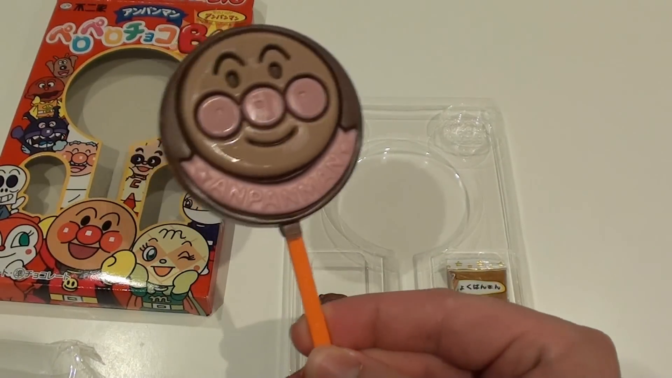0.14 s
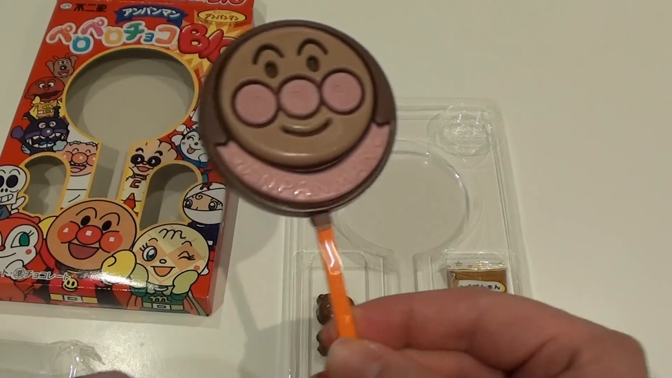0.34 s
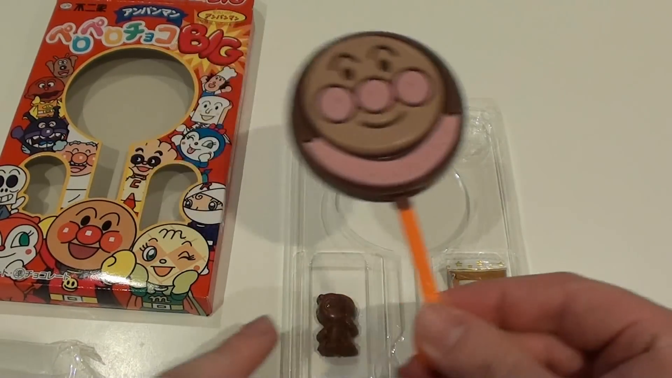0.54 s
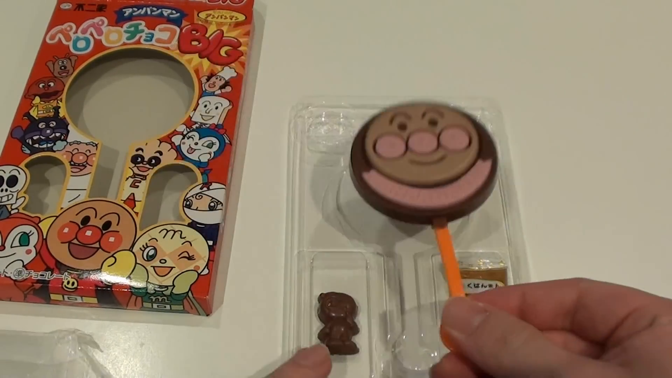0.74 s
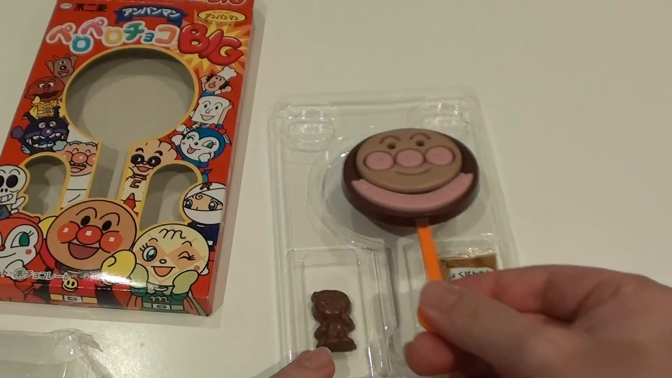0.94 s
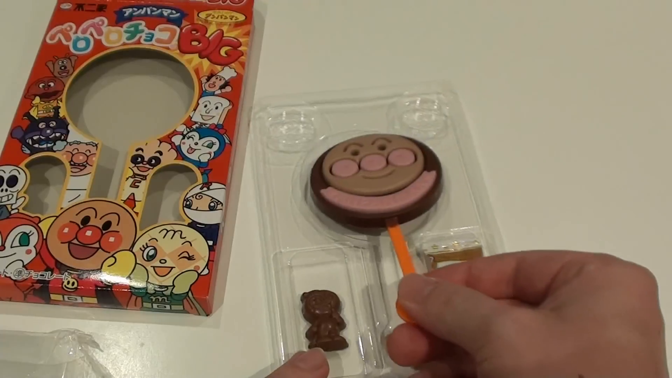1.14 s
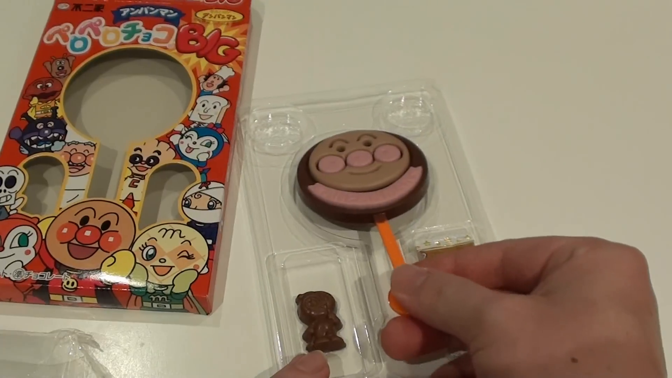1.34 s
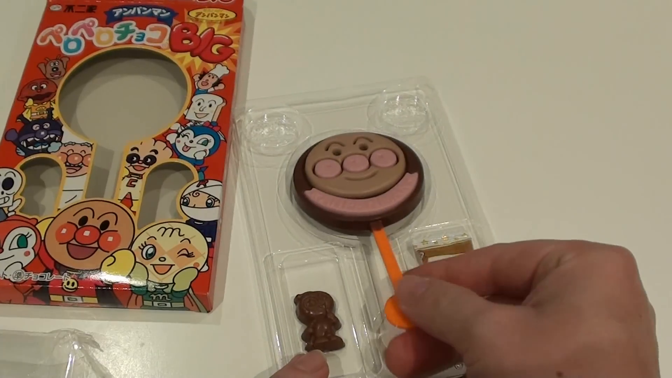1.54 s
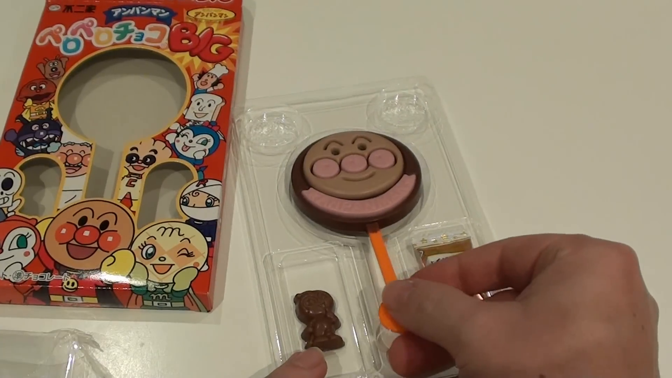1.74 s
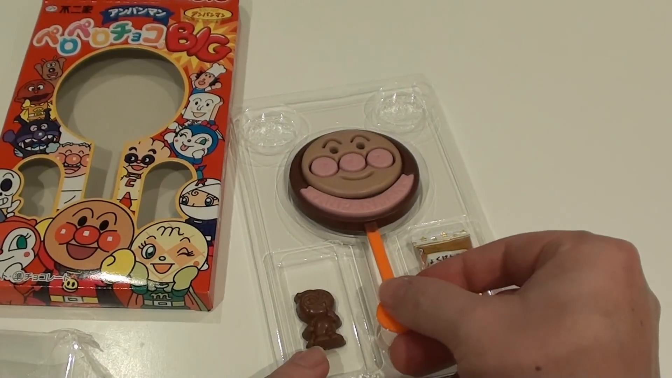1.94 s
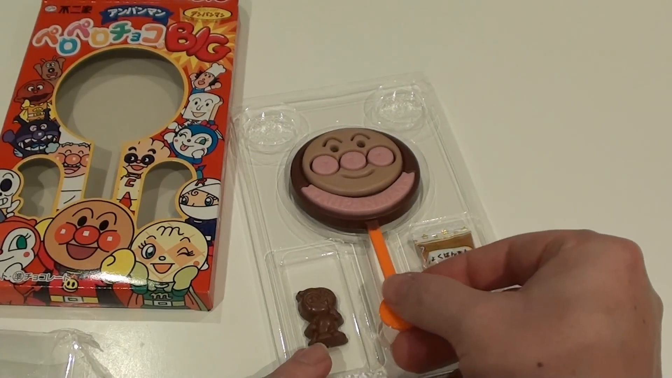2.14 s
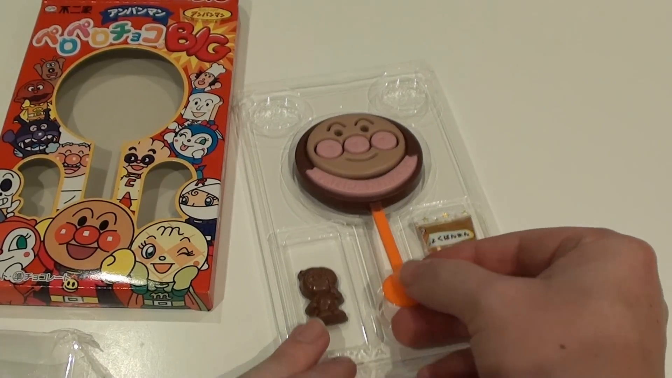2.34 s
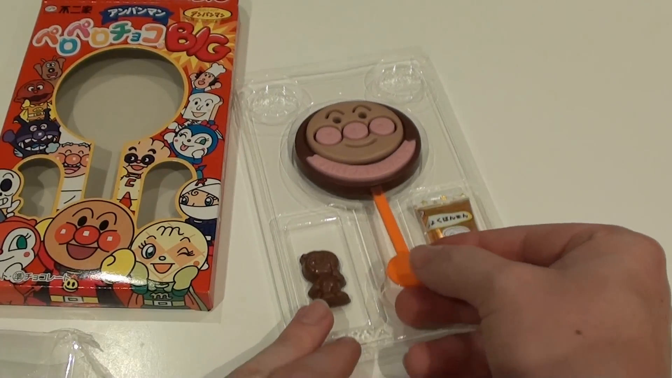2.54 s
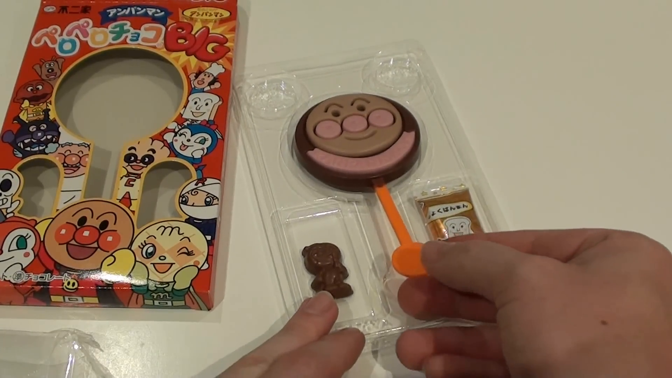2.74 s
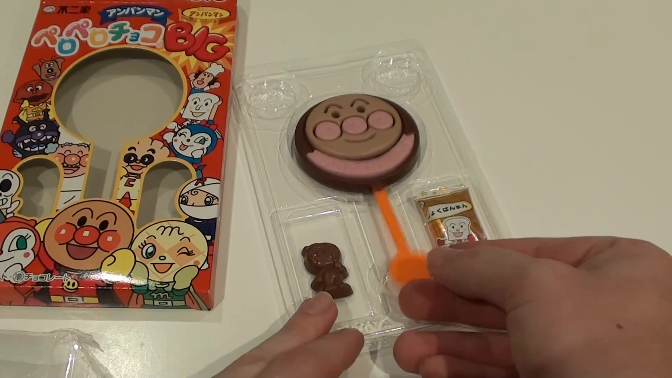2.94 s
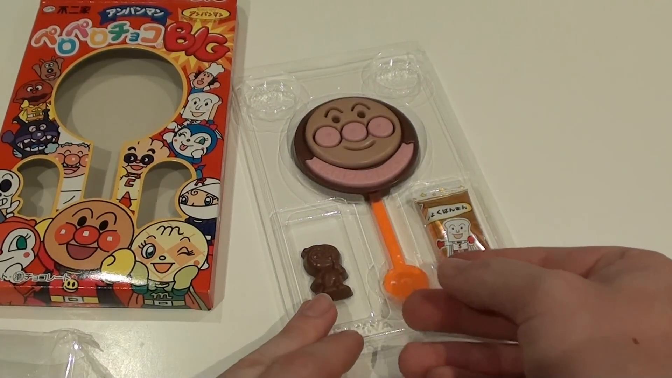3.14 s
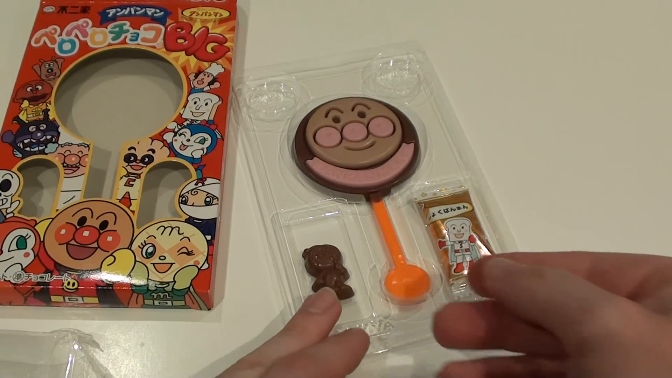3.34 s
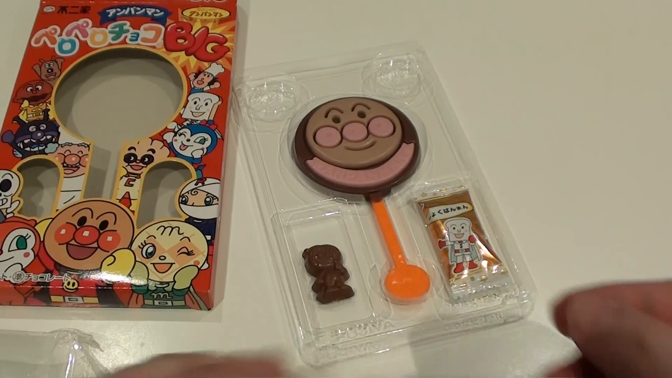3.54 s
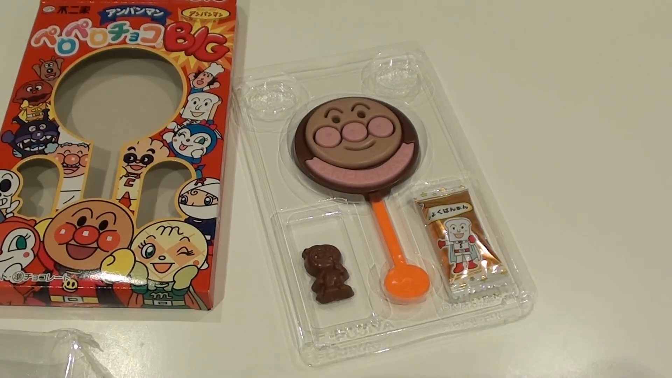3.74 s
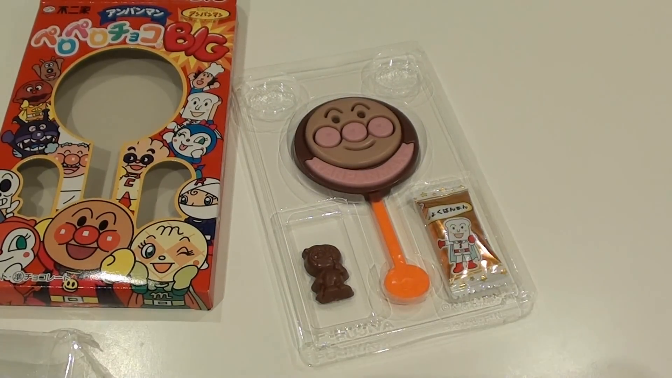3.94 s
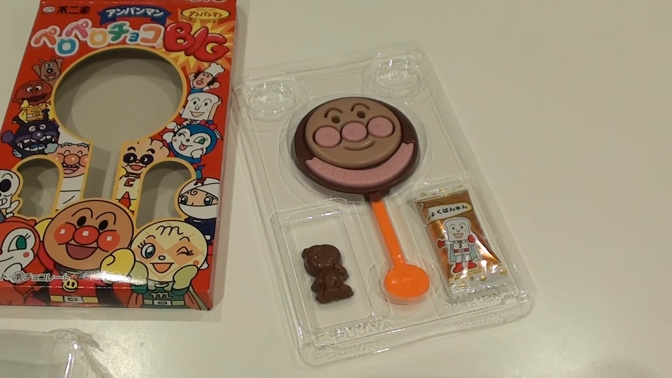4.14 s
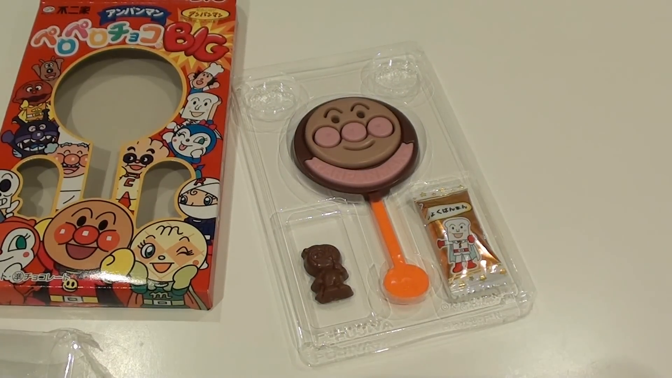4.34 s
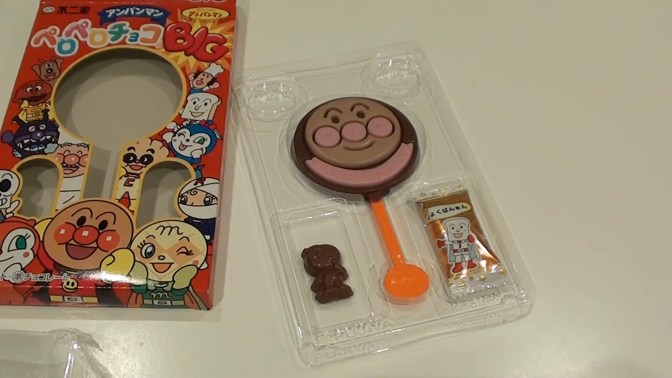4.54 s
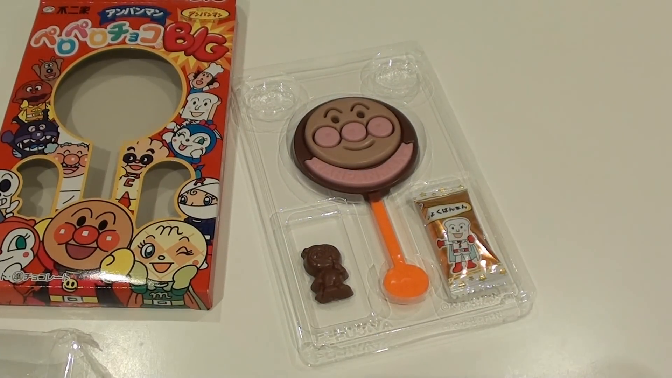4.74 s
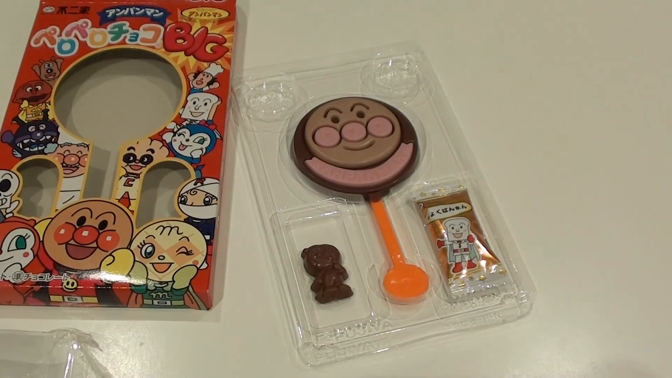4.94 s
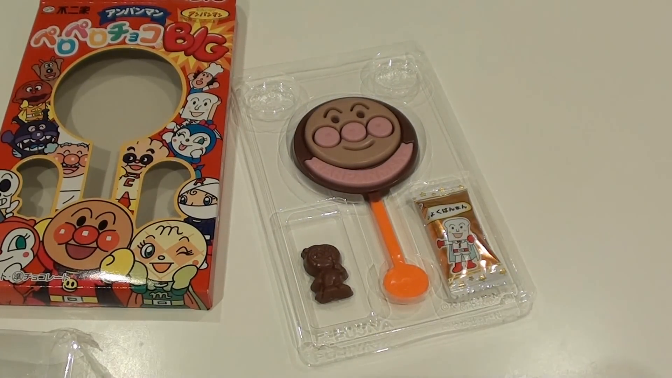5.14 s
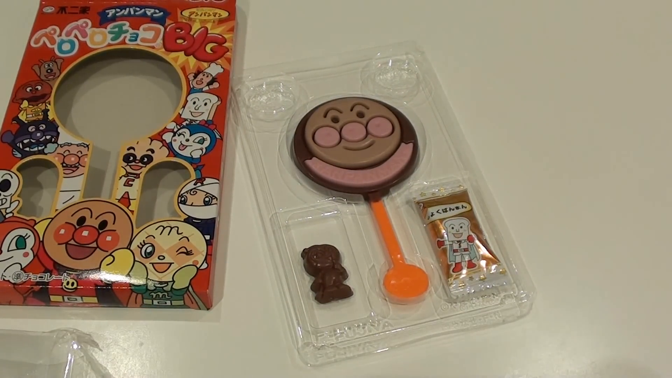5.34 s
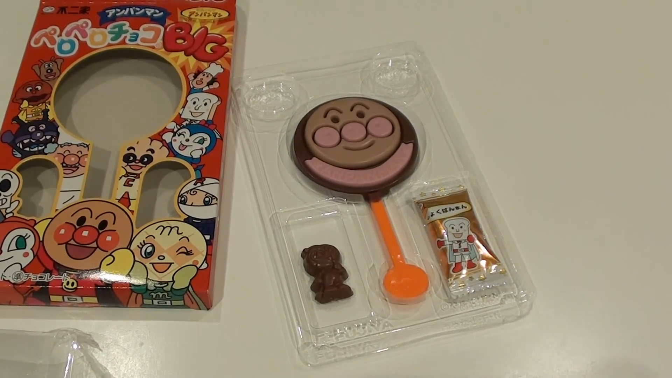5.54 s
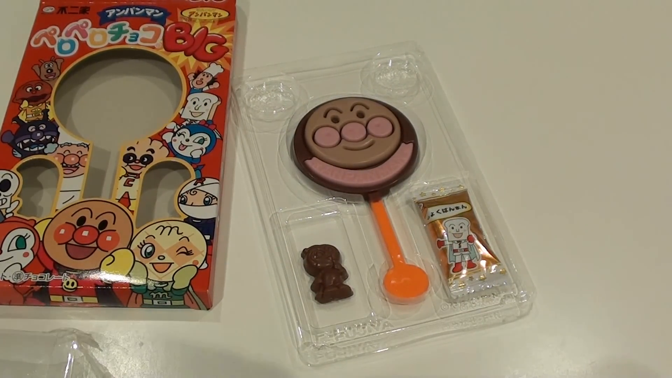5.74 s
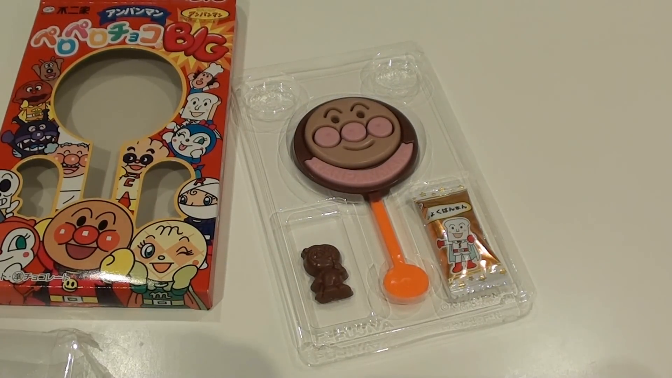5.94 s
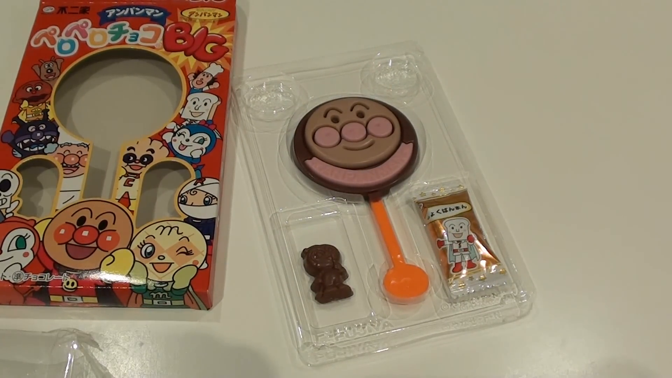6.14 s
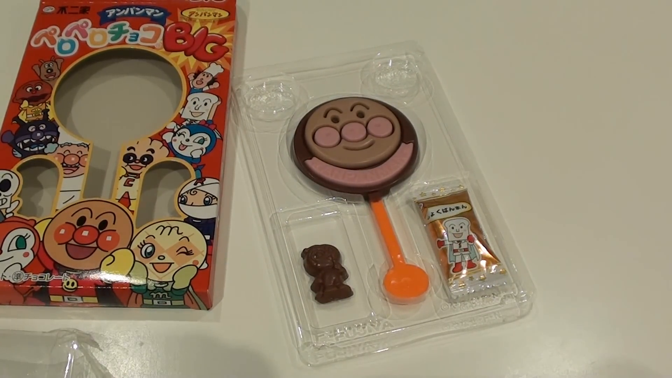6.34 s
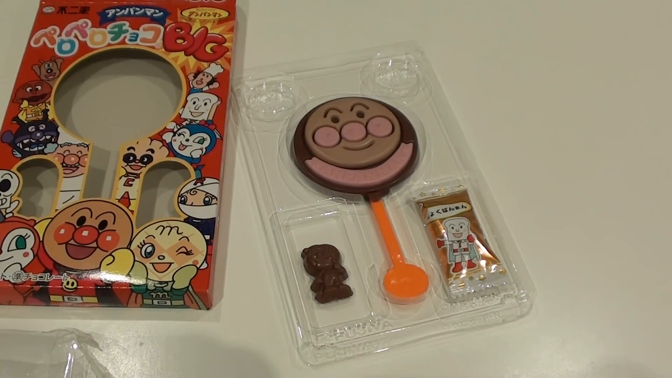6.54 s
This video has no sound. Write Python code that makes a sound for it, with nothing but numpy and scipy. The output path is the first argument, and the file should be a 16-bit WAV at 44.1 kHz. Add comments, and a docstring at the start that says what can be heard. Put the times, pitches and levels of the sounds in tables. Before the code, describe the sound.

Thin plastic packaging crackles, scrapes across a table and gives one hollow pop, followed by a faint sleeve brush and two small button clicks.

```python
"""A thin plastic blister tray crinkles over quiet room noise as a chocolate lolly is pressed into it.
Its creases tick, its side walls ring, and the sweet scrapes by stick-slip. The tray is slid over the
table, then its floor buckles back with one hollow pop as the fingers let go. A sleeve brushes the
table and the button of a nearby camera clicks twice. The small room adds a short tail."""
import sys
import numpy as np
from scipy import signal
from scipy.fft import rfft, irfft
from scipy.io import wavfile

SR = 44100
rng = np.random.default_rng(int(sys.argv[2]) if len(sys.argv) > 2 else 0)


def file_out(sig):
    """Save sig as 16-bit WAV at sys.argv[1]."""
    # one column per channel
    cols = np.atleast_2d(sig).T
    # limit, then scale
    lim = np.clip(cols, -1, 1)
    pcm = np.round(lim * 32767).astype(np.int16)
    wavfile.write(sys.argv[1], SR, pcm)


N = 291060
T = np.arange(N) / SR

# room rumble and microphone hiss: freq_hz, level_db
NOISE_SPECTRUM = [(20, -15), (50, -8.5), (100, 0), (125, -3), (170, 1), (280, 0.5), (400, -4.5), (900, -7),
                  (2000, -12.5), (4000, -12), (7500, -15), (10000, -13.5), (16000, -16)]
# camera hiss: freq_hz, level_db
CAMERA_HISS_SPECTRUM = [(4000, -24), (4550, 4), (4950, -10), (5430, 3), (6100, -12.5), (7000, -6.5),
                        (7600, -3), (8500, -34.5)]
# mains hum and camera whine: pitch_hz, level_db
STEADY_TONES = [(100, -74.5), (1066, -81), (6900, -80), (7500, -85), (8650, -82.5)]
# stereo width of the room noise: freq_hz, side_gain_db
NOISE_WIDTH = [(110, -15.5), (200, -11.5), (380, -2), (700, 1), (1300, 2), (2400, -1), (4400, -4),
               (8100, -7.5), (15000, -36.5)]
# stereo width of the reflections: freq_hz, side_gain_db
REFLECTION_WIDTH = [(200, -11.5), (700, -6.5), (1400, -7), (4400, -3.5), (8000, -2.5), (14000, -68)]
# sleeve on the table: time_s, drag_db, hiss_db
SLEEVE_LEVELS = [(3.6, -62.5, -68), (4.0, -62, -66), (4.16, -56, -59.5), (4.3, -58, -60.5),
                 (4.44, -59, -59), (4.58, -59.5, -52), (4.68, -63.5, -65), (5.0, -64, -75),
                 (5.3, -68.5, -75)]
# cloth drag: freq_hz, level_db
DRAG_SPECTRUM = [(200, -4), (700, -0.5), (2200, 0.5), (4500, -2.5), (7500, -4), (10000, -12), (16000, -34)]
# fine cloth hiss: freq_hz, level_db
CLOTH_HISS_SPECTRUM = [(2500, -17.5), (5000, -8.5), (7500, -1.5), (10000, -7.5), (16000, -16)]
# dull contacts on tray and table: start_s, level_db, pitch_hz
SOFT_TOUCHES = [(1.246, -47, 328), (4.048, -48, 700), (4.74, -54, 283)]
# camera button presses: start_s, level_db, treble_db
BUTTON_PRESSES = [(6.1234, -40, -7.5), (6.469, -29, -0.5)]
# button resonances: pitch_hz, level_db, t60_s
CLICK_MODES = [(1103, -5, 0.061), (2260, -12, 0.028), (2710, -5.5, 0.042), (3300, 8.5, 0.0046),
               (3770, -0.5, 0.019), (3780, -20, 0.12), (4330, 3, 0.012), (5840, -1, 0.011),
               (6370, -4.5, 0.011), (8000, -0.5, 0.0058)]
# fingertips on the tray floor: start_s, level_db
FINGER_PUSHES = [(1.03, -44), (1.155, -38), (1.258, -37.5), (1.345, -42), (1.625, -43), (3.402, -40)]
# flexing tray base: freq_hz, level_db
PANEL_SPECTRUM = [(130, -45.5), (186, -10.5), (240, -15.5), (600, -8.5), (950, -6), (1150, 0.5),
                  (1800, 0.5), (2400, -4), (3400, -16), (6000, -51)]
# small side walls: freq_hz, level_db
WALL_SPECTRUM = [(300, -26.5), (700, -13), (1100, -2), (1700, 2.5), (2150, -1), (2700, -18), (5000, -30.5),
                 (15000, -51)]
# stiff creases: freq_hz, level_db
CREASE_SPECTRUM = [(1200, -23), (2500, 1.5), (3400, -5), (4200, 0), (5100, -5), (6300, 0.5), (8300, -1.5),
                   (9300, -7.5), (12000, -13.5), (16000, -28)]
# one long light hold, then single hand strokes: start_s, length_s, panel_db, crease_db
RUB_STROKES = [(0.68, 1.45, -65, -66), (0.863, 0.047, -51, -56.5), (0.985, 0.14, -49.5, -53),
               (1.138, 0.24, -48, -57), (1.395, .11, -49.5, -69), (1.804, 0.025, -58.5, -65),
               (2.005, 0.27, -56, -71), (2.871, 0.23, -66, -63.5), (3.285, 0.086, -53.5, -55.5)]
# clearest crinkles: start_s, spread_s, wall_db, crease_db
CLEAR_CRINKLES = [(0.802, .002, -62, -55), (0.823, 0.0097, -60, -52), (0.834, 0.017, -58, -46),
                  (0.862, .005, -47, -67), (0.991, 0.007, -44.5, -47.5), (1.025, 0.0078, -48, -41),
                  (1.133, .0015, -41, -48), (1.150, 0.0034, -37.5, -46), (1.197, 0.0015, -42, -48),
                  (1.216, 0.0016, -40, -52), (1.238, 0.0019, -38, -47), (1.270, 0.011, -38, -40),
                  (1.314, 0.009, -39, -43), (1.353, .0012, -41, -47), (1.410, 0.0027, -44, -51),
                  (1.424, 0.0081, -38.5, -44.5), (1.433, 0.0028, -39.5, -45.5),
                  (1.470, 0.0054, -42.5, -43.5), (1.483, .006, -42.5, -44.5), (1.498, 0.021, -37.5, -44.5),
                  (1.539, 0.0032, -39, -40), (1.618, .0015, -52, -66), (1.672, 0.0014, -46.5, -56),
                  (1.803, .004, -38.5, -41.5), (1.874, 0.0065, -46.5, -64), (2.036, 0.0032, -45.5, -55),
                  (2.046, 0.014, -40.5, -57), (2.096, 0.0012, -49, -68), (2.106, 0.0023, -51, -74),
                  (2.187, 0.005, -49, -58), (3.067, 0.0049, -43.5, -54), (3.086, 0.014, -34, -41.5),
                  (3.401, 0.0013, -47.5, -43.5)]
# creases flipping over: start_s, level_db
CREASE_FLIPS = [(0.9928, -31.5), (1.0605, -11.5), (1.072, -38), (1.0905, -23.5), (1.2694, -43),
                (3.0987, -18.5), (3.131, -34), (3.1392, -24)]
# resonances of a flipping crease: pitch_hz, level_db, t60_s
CREASE_MODES = [(2040, -6.5, 0.0033), (2555, -5, 0.01), (3400, -13.5, 0.0096), (4320, -8, 0.0039),
                (5580, -3, 0.0046), (6410, -3.5, 0.008), (7200, -5.5, 0.0056), (8780, -10.5, 0.0037),
                (10400, -17, .003), (12400, -19, .003), (14000, -21, .003)]
# tray floor buckling: start_s, level_db
BUCKLES = [(3.0987, -29), (3.1023, -9), (3.133, -31)]
# tray floor resonances: pitch_hz, level_db, t60_s
TRAY_MODES = [(185.3, -7.5, 0.26), (209, -10.5, 0.18), (270, -13.5, 0.069), (334, -22.5, 0.25),
              (396, -23.5, 0.39), (421, -17.5, 0.15), (498, -13.5, 0.17), (576, -40, 0.45), (680, -17, .28),
              (761, -11, .13), (816, -14, .18), (840, -12.5, 0.094), (925, -0.5, .045), (917.5, -12, 0.075),
              (935, -2, 0.12), (1028, -10, 0.16), (1048, -17.5, 0.34), (1143, -17, 0.21), (1227, -26, 0.41),
              (1234, -2, 0.023), (1495, -19.5, 0.3), (1536, -16.5, 0.29), (1750, -24, 0.21),
              (1910, -26, 0.36), (2160, -11, 0.023), (2885, -13.5, 0.0076), (4100, -9.5, 0.0079)]
# dense weaker modes of the whole tray: freq_hz, level_db
SHUDDER_SPECTRUM = [(140, -58.5), (200, -27.5), (280, -8), (600, -9.5), (950, -1), (1300, -4.5), (1700, -6),
                    (2100, -9), (2650, -25.5), (4300, -23), (7000, -33.5), (15000, -51)]


def undb(db):
    """Decibels to gain."""
    return 10 ** (np.asarray(db) / 20)


def unit(x):
    """Scale to unit rms."""
    return x / np.sqrt(np.mean(x ** 2))


def convolve(x, response):
    """Convolution cut to scene length."""
    return signal.oaconvolve(x, response)[:N]


def bin_gains(spectrum, size):
    """FFT bin gains from (freq_hz, level_db) rows, interpolated in log frequency."""
    freq_hz, level_db = np.transpose(spectrum)
    bins_hz = np.maximum(np.arange(size // 2 + 1) * SR / size, 1)
    return undb(np.interp(np.log(bins_hz), np.log(freq_hz), level_db))


def colour(spectrum, size=4096):
    """Minimum-phase response of unit energy."""
    cepstrum = irfft(np.log(bin_gains(spectrum, size)))
    cepstrum[1:size // 2] *= 2
    cepstrum[size // 2 + 1:] = 0
    response = irfft(np.exp(rfft(cepstrum)))
    return response / np.linalg.norm(response)


def stereo_side(x, width):
    """Filtered side signal, opposite in left and right."""
    return np.outer([1, -1], irfft(rfft(x) * bin_gains(width, N), N))


def fade(t60_s, size=32768):
    """Exponential decay."""
    return np.exp(-np.log(1000) * T[:size] / t60_s)


def tail(t60_s):
    """Dense modes dying together: decaying noise of unit energy."""
    envelope = fade(t60_s)
    noise = envelope * rng.standard_normal(len(envelope))
    return noise / np.linalg.norm(noise)


def ring(modes, size=32768):
    """Damped modes of alternating sign."""
    return sum((-1) ** k * undb(level_db) * fade(t60_s) * np.sin(2 * np.pi * pitch_hz * T[:size])
               for k, (pitch_hz, level_db, t60_s) in enumerate(modes))


def add(track, start_s, sound):
    """Mix a sound in place."""
    start = int(start_s * SR)
    track[start:start + len(sound)] += sound[:N - start]


def impulses(rows):
    """One impulse per (start_s, level_db) row."""
    track = np.zeros(N)
    for start_s, level_db in rows:
        add(track, start_s, undb([level_db]))
    return track


def burst(drive, response, level_db):
    """Short filtered sound with the energy of 10 ms at level_db."""
    sound = signal.fftconvolve(drive, response)
    return sound * undb(level_db) * np.sqrt(SR / 100) / np.linalg.norm(sound)


def background(noise_db=-57.5, hiss_db=-67):
    """Diffuse room noise, mains hum, camera hiss and whine."""
    mid, side = (undb(noise_db) * convolve(noise, colour(NOISE_SPECTRUM))
                 for noise in rng.standard_normal((2, N)))
    hiss = undb(hiss_db) * convolve(rng.standard_normal(N), colour(CAMERA_HISS_SPECTRUM))
    tones = sum(np.sqrt(2) * undb(level_db) * np.sin(2 * np.pi * (pitch_hz * T + rng.random()))
                for pitch_hz, level_db in STEADY_TONES)
    return mid + hiss + tones + stereo_side(side, NOISE_WIDTH)


def room(x, wet_db, early_db, late_t60_s=0.36, early_t60_s=0.04, late_side_db=-3):
    """Walls add a diffuse tail after 5 ms; early reflections widen the sound."""
    late, late_side = (undb(wet_db) * convolve(x, np.pad(tail(late_t60_s), (SR // 200, 0)))
                       for _ in range(2))
    side = undb(early_db) * convolve(x, tail(early_t60_s)) + undb(late_side_db) * late_side
    return x + late + stereo_side(side, REFLECTION_WIDTH)


def sleeve(grain_db=3):
    """Cloth fibres drag over the table, briefly brighter before fading."""
    time_s, drag_db, hiss_db = np.transpose(SLEEVE_LEVELS)
    fibres = unit(rng.standard_normal((2, N)) * undb(grain_db * rng.standard_normal((2, N))))
    drag = convolve(fibres[0], colour(DRAG_SPECTRUM)) * undb(np.interp(T, time_s, drag_db))
    hiss = convolve(fibres[1], colour(CLOTH_HISS_SPECTRUM)) * undb(np.interp(T, time_s, hiss_db))
    return (drag + hiss) * (T > time_s[0])


def touches(t60_cycles=9, skirt_db=-16):
    """Soft contacts thud around one pitch each."""
    out = np.zeros(N)
    for start_s, level_db, pitch_hz in SOFT_TOUCHES:
        thud = colour([(pitch_hz / 3, skirt_db), (pitch_hz, 0),
                       (pitch_hz * 3, skirt_db), (pitch_hz * 10, 2 * skirt_db)])
        add(out, start_s, burst(tail(t60_cycles / pitch_hz), thud, level_db))
    return out


def button(rattle_db=-9, rattle_t60_s=0.026):
    """Light half press, then a brighter full click; the high modes rattle the casing."""
    out = np.zeros(N)
    low, high = ring(CLICK_MODES[:1]), ring(CLICK_MODES[1:])
    for start_s, level_db, treble_db in BUTTON_PRESSES:
        rattle = undb(rattle_db) * signal.fftconvolve(high, tail(rattle_t60_s))[:len(high)]
        add(out, start_s, undb(level_db) * (low - undb(treble_db) * (high + rattle)))
    return out


def pushes(damping_t60_s=0.46):
    """Fingertips nudge and damp the three lowest tray floor modes."""
    return convolve(impulses(FINGER_PUSHES), ring(TRAY_MODES[:3]) * fade(damping_t60_s))


def stroke(start_s, length_s, attack_s, release_s, slope_db_per_s):
    """Force of one hand movement: ramp, sloping hold, exponential release."""
    age_s = np.maximum(T - start_s, 0)
    attack = np.minimum(age_s / attack_s, 1)
    release = np.exp(-np.maximum(age_s - length_s, 0) / release_s)
    return attack * undb(slope_db_per_s * age_s) * release


def friction(panel_force, crease_force, scatter_db, slips_per_s, panel_t60_s, contacts=3, size=4096):
    """Dense stick-slip; each contact stirs its own mix of panel modes and ticks the creases."""
    slips = np.zeros((contacts, N))
    slipping = rng.random((contacts, N)) < slips_per_s / SR
    sign, strength = rng.standard_normal((slipping.sum(), 2)).T
    slips[slipping] = np.sign(sign) * undb(scatter_db * np.clip(strength, -2, 2))
    slips = unit(slips) / np.sqrt(contacts)
    flex = sum(convolve(contact * panel_force, tail(panel_t60_s)[:size]) for contact in slips)
    ticks = slips.sum(axis=0) * crease_force
    return convolve(flex, colour(PANEL_SPECTRUM)) + convolve(ticks, colour(CREASE_SPECTRUM))


def sliding(panel_db=-45, crease_db=-48.5, shove_panel_db=3, shove_crease_db=4.5,
            shove_s=2.388, shove_width_s=0.085):
    """The tray hisses over the table: a louder, brighter shove eases into a glide."""
    force = stroke(start_s=2.253, length_s=0.5, attack_s=0.069, release_s=0.073, slope_db_per_s=-6.5)
    shove = np.exp(-((T - shove_s) / shove_width_s) ** 2)
    panel_force = force * undb(panel_db + shove_panel_db * shove)
    crease_force = force * undb(crease_db + shove_crease_db * shove)
    return friction(panel_force, crease_force, scatter_db=1, slips_per_s=2300, panel_t60_s=0.057)


def crinkles(rows, wall_t60_s=0.025, scatter_db=3, first_slip=0.6, slips_per_s=8000,
             soften_hz=13000, size=4096):
    """Slip clusters: creases tick at once, walls ring on. Returns wall and crease tracks."""
    wall = colour(WALL_SPECTRUM)
    crease = signal.sosfilt(signal.butter(2, soften_hz, fs=SR, output="sos"), colour(CREASE_SPECTRUM))
    walls, creases = np.zeros((2, N))
    for start_s, spread_s, wall_db, crease_db in rows:
        sign, strength = rng.standard_normal((2, size))
        slipping = rng.random(size) < slips_per_s / SR
        slips = np.sign(sign) * slipping * undb(scatter_db * np.clip(strength, -2, 2))
        slips[0] = first_slip * undb(scatter_db)
        slips *= np.exp(-T[:size] / spread_s)
        flex = signal.fftconvolve(slips, tail(wall_t60_s)[:size])
        add(walls, start_s, burst(flex, wall, wall_db))
        add(creases, start_s, burst(slips, crease, crease_db))
    return walls, creases


def small_crinkles(relative_db=-3, scatter_db=3, spread_s=0.0023, count=56):
    """Unevenly spaced crinkles during the long hold, at unit force."""
    hold_start_s, hold_length_s = RUB_STROKES[0][:2]
    chance = rng.random((count, 3))
    starts_s = hold_start_s + hold_length_s * (np.arange(count) + chance[:, 0]) / count
    levels_db = relative_db + scatter_db * (2 * chance[:, 1:] - 1)
    return crinkles(np.column_stack([starts_s, np.full(count, spread_s), levels_db]))


def sticking(build_s=0.014, dip_db=-2.5, size=4096):
    """Rubbing gain: dips as the sweet sticks, returns as each clear crinkle lets go."""
    tension, build = np.zeros(N), np.exp(-T[:size] / build_s)[::-1]
    for start_s, *_ in CLEAR_CRINKLES:
        add(tension, start_s - size / SR, build)
    return undb(dip_db * np.minimum(tension, 1))


def rubbing(scrape_db=-1.5):
    """The sweet is pressed home; the same force drives scrape and faint crinkles."""
    strokes = np.array([stroke(start_s, length_s, attack_s=0.018, release_s=0.042, slope_db_per_s=1.5)
                        for start_s, length_s, _, _ in RUB_STROKES])
    stroke_gains = undb(np.array(RUB_STROKES)[:, 2:])
    panel_force, crease_force = stroke_gains.T @ strokes * sticking()
    walls, creases = small_crinkles()
    scrape = friction(panel_force, crease_force, scatter_db=4.5, slips_per_s=1400, panel_t60_s=0.035)
    return undb(scrape_db) * scrape + walls * panel_force + creases * crease_force


def snaps():
    """Creases flip over and ring briefly."""
    return convolve(impulses(CREASE_FLIPS), ring(CREASE_MODES))


def pop(shudder_db=17, shudder_t60_s=0.39, linger_db=11, linger_t60_s=0.71, spread_s=0.0027,
        low_cut_hz=170):
    """The tray floor flips like a drum skin; a shudder spreads through the whole tray."""
    dense_modes = undb(shudder_db) * tail(shudder_t60_s) + undb(linger_db) * tail(linger_t60_s)
    dense_modes *= 1 - np.exp(-T[:len(dense_modes)] / spread_s)
    kicks = impulses(BUCKLES)
    ringing = convolve(kicks, ring(TRAY_MODES))
    shudder = convolve(convolve(kicks, dense_modes), colour(SHUDDER_SPECTRUM))
    # a small sheet radiates little below its first mode
    low_cut = signal.ellip(4, 1, 23, low_cut_hz, "high", fs=SR, output="sos")
    return signal.sosfilt(low_cut, ringing + shudder)


def scene():
    """Tray, hand and camera in the room, in stereo."""
    walls, creases = crinkles(CLEAR_CRINKLES)
    handling = walls + creases + rubbing() + sliding() + pushes() + touches() + sleeve()
    return (room(handling, wet_db=-13.5, early_db=-16.5)
            + room(snaps(), wet_db=-12.5, early_db=-16)
            + room(pop(), wet_db=-11, early_db=-12.5)
            + room(button(), wet_db=-35, early_db=-8)
            + background())


def record(dry, cutoff_hz=15900):
    """The camera cuts the top treble."""
    return signal.sosfilt(signal.ellip(10, 0.1, 80, cutoff_hz, fs=SR, output="sos"), dry)


dry = scene()
out = record(dry)
file_out(out)
```